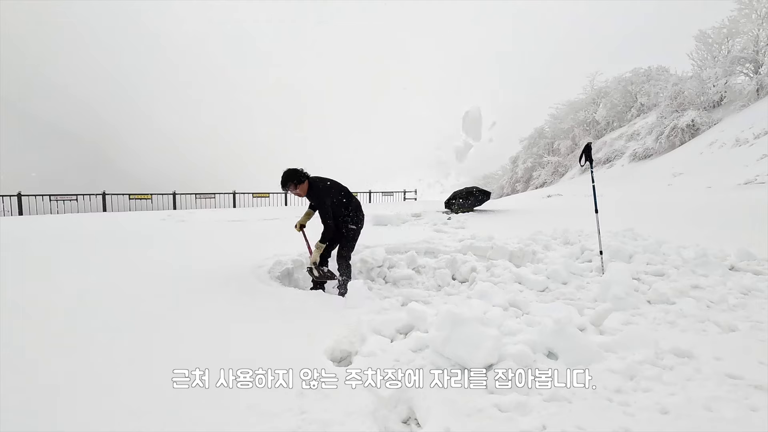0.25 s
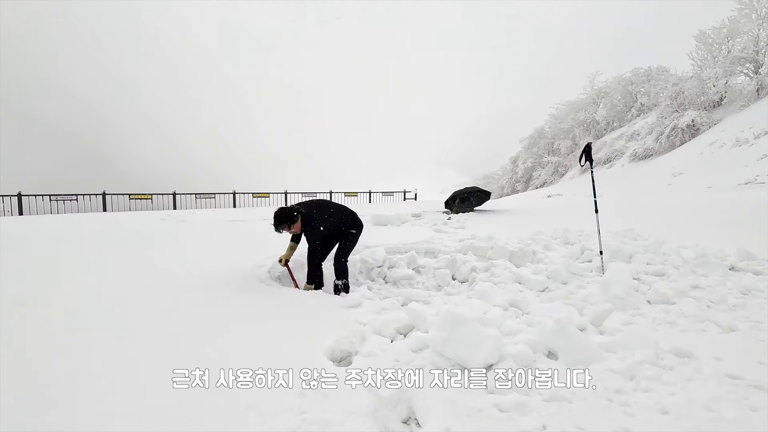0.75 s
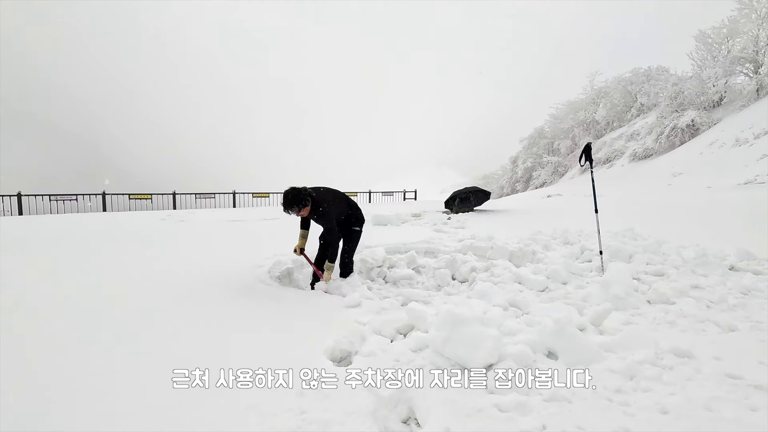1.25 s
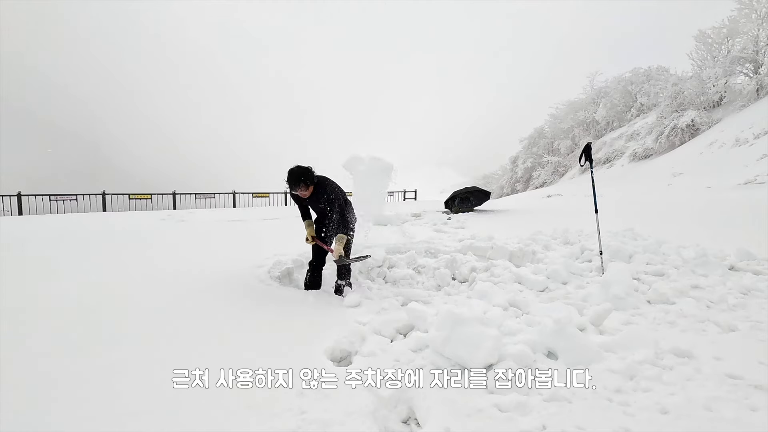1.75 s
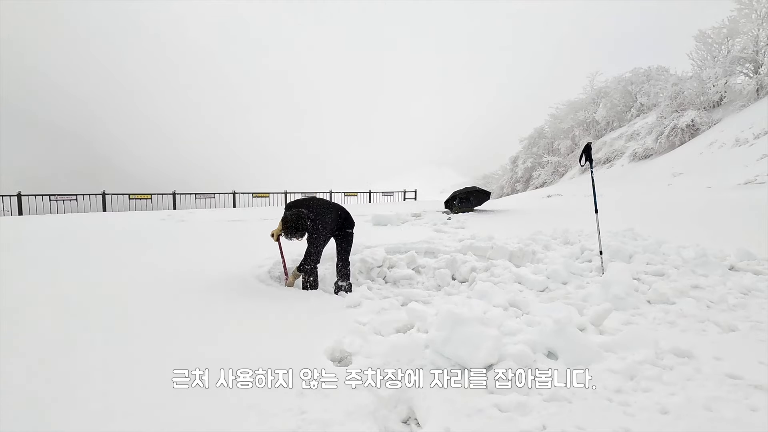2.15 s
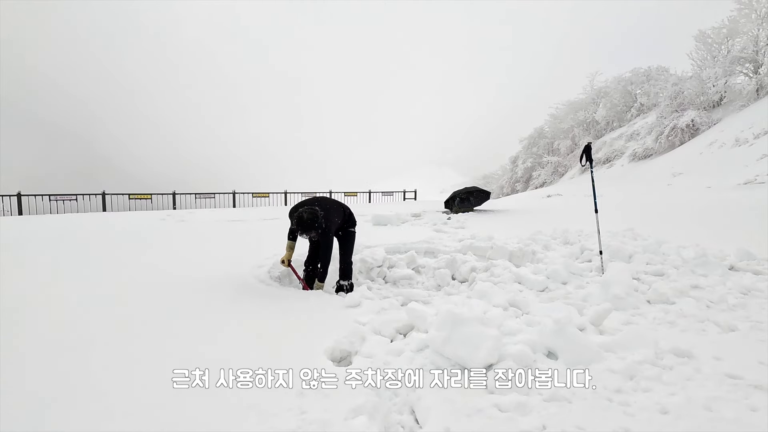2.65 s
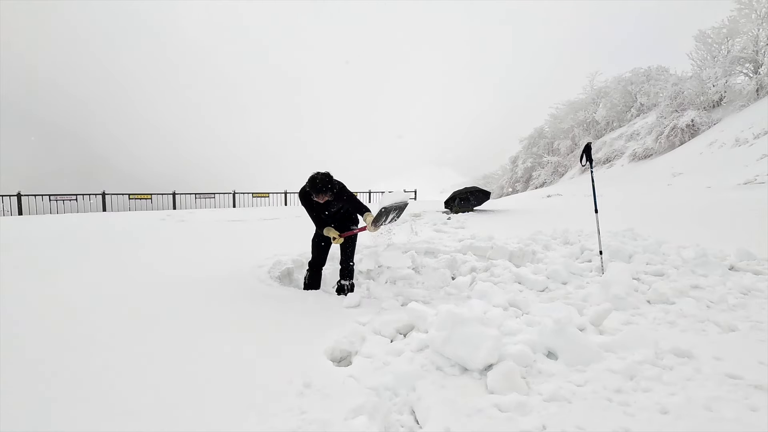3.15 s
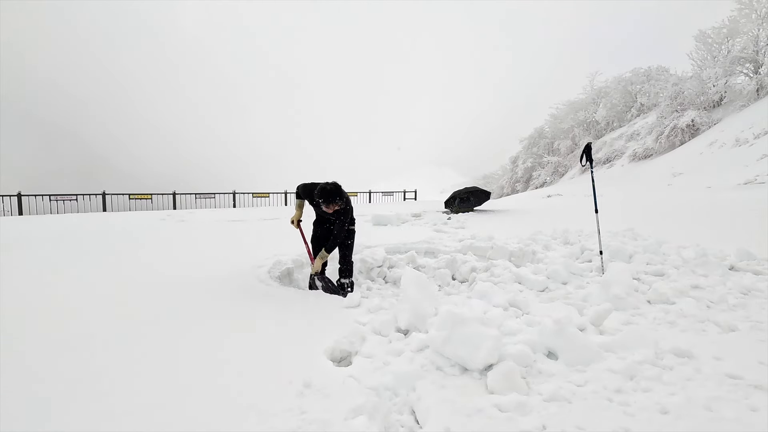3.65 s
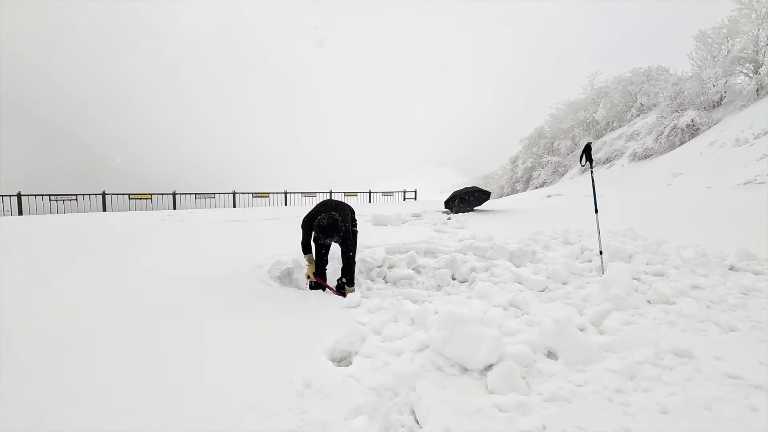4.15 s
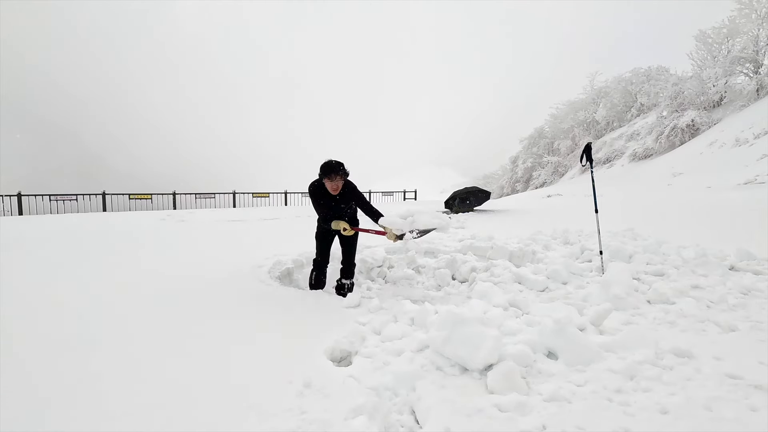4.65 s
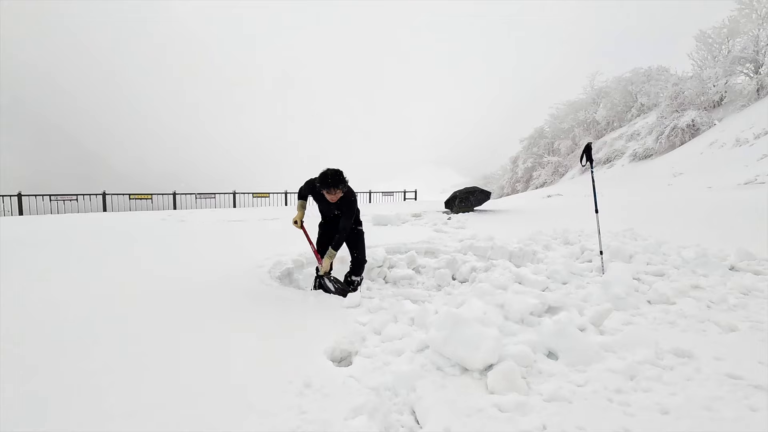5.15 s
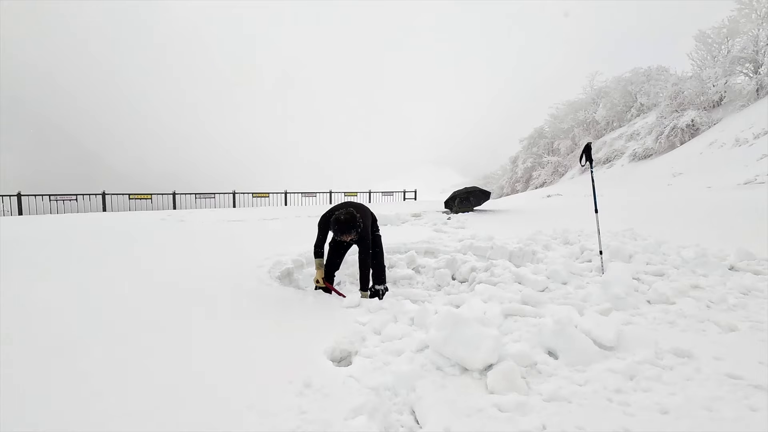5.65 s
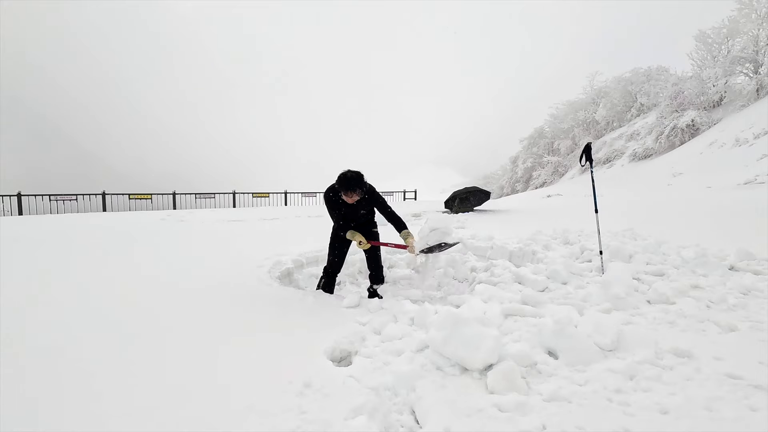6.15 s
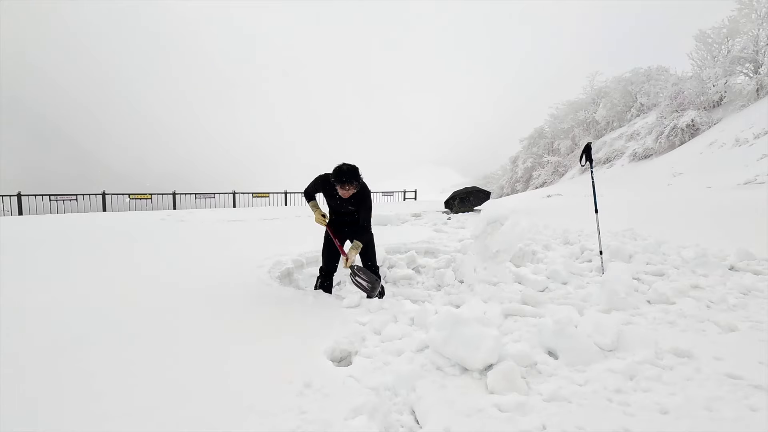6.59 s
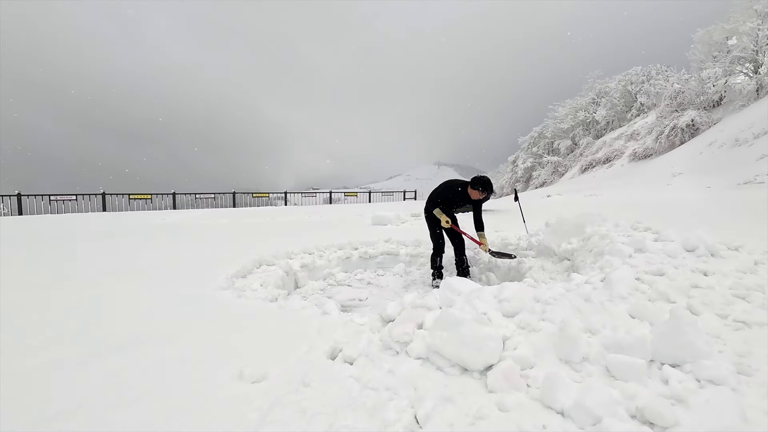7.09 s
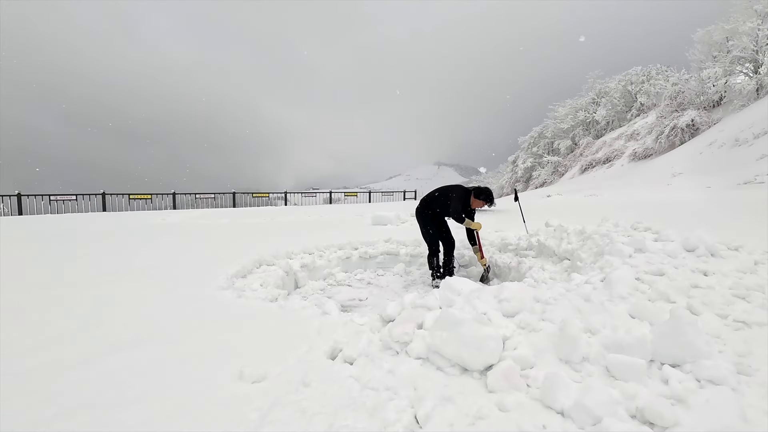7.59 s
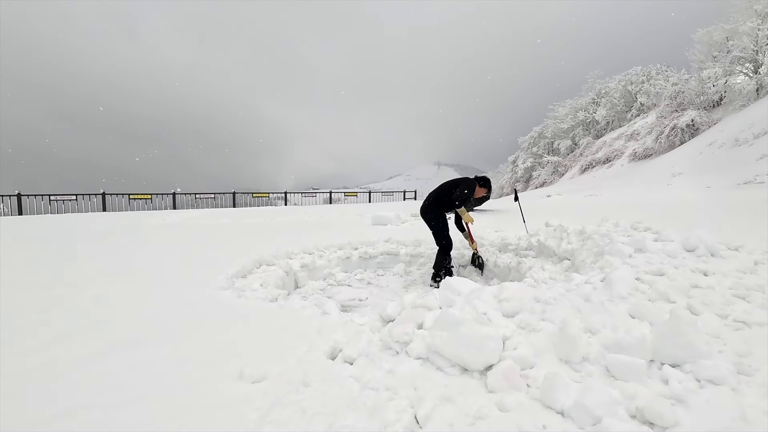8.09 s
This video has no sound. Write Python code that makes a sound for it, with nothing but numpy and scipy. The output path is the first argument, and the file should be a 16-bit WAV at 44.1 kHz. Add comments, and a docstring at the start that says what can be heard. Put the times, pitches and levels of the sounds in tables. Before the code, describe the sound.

A light metal shovel bites, scrapes and throws crunchy crusted snow on an open slope, while low wind buffets the microphone and roars behind.

```python
"""A light metal shovel bites, scrapes and throws crusty snow on an open hillside, a few metres off.
Crackling noise is the breaking snow; it also drives the ringing modes of the blade, and some tones squeak.
Wind buffets the microphone ports as low noise with single bumps, and noise in a higher band roars over
the slope; late on the roar stops abruptly. Open air and microphones add faint hiss."""
import sys
import numpy as np
from scipy import signal
from scipy.fft import rfft, irfft
from scipy.io import wavfile
from scipy.ndimage import uniform_filter1d

SR = 44100
rng = np.random.default_rng(int(sys.argv[2]) if len(sys.argv) > 2 else 0)


def undo_db(level):
    """Turn decibels back into plain size, where 20 dB means ten times bigger."""
    steps = np.asarray(level, float) / 20
    return 10 ** steps


def to_wav(s):
    """Save 16-bit WAV."""
    ch = np.atleast_2d(s).T  # columns
    pcm = np.round(np.clip(ch, -1, 1) * 32767)  # PCM
    wavfile.write(sys.argv[1], SR, pcm.astype(np.int16))


N = 367073  # length [samples]
TIME = np.arange(N) / SR  # [s]
STEP = np.arange(0, N / SR + .002, .002)  # coarse time for slow curves [s]
ROAR_STOP_S = 6.753


def evened(x):
    """Scales to rms 1."""
    return x / np.sqrt(np.mean(x ** 2) + 1e-20)


def read(points, hz):
    """Reads a spectrum on a log-frequency axis."""
    f, value = np.transpose(points)
    return np.interp(np.log(hz + 1), np.log(f + 1), value)


def filtered(x, order, hz, kind):
    """Keeps what lies below ("low") or above ("high") a frequency, without delay."""
    return signal.sosfiltfilt(signal.butter(order, hz, kind, fs=SR, output="sos"), x)


def add(mix, s, sound):
    """Mixes a sound in at s seconds."""
    part = mix[..., max(round(s * SR), 0):][..., :sound.shape[-1]]
    part += sound[..., :part.shape[-1]]


def sides(db):
    """Left and right gains for a level difference."""
    return undo_db(np.array([db / 2, -db / 2]))


def fine(x):
    """From steps of 2 ms to samples."""
    return np.interp(TIME, STEP, x)


def swells(middle, length, db):
    """One bell-shaped rise and fall per event, each a row."""
    away = (STEP - middle[:, None]) / length[:, None]
    return undo_db(db[:, None]) * np.exp(-(2 * away) ** 2)


def blend(shapes, *columns):
    """Level of overlapping events, the strongest prevailing, and each column weighted by power."""
    power = np.sum(shapes ** 2, axis=0)
    level = np.linalg.norm(shapes, ord=6, axis=0)
    return [level] + [np.array(c) @ shapes ** 2 / power for c in columns]


def wander(seconds, spread_db):
    """A gain that drifts by chance."""
    knots = np.arange(0, N / SR + 1, seconds)
    return np.interp(TIME, knots, undo_db(spread_db * rng.standard_normal(len(knots))))


def random_patches(shape, bins, frames):
    """Smooth random patches over frequency and time, rms 1."""
    patches = uniform_filter1d(rng.standard_normal(shape), size=bins, axis=0)
    return evened(uniform_filter1d(patches, size=frames, axis=1))


def pair(tone, size, same, patchy_db):
    """Two channels of partly alike noise with drifting patches."""
    hz, frames = np.fft.rfftfreq(size, 1 / SR), 4 * N // size + 5
    a, b, c, d = rng.standard_normal((4, len(hz), frames))
    same = np.clip(same * np.ones(len(hz)), -1, 1)[:, None]
    left = a + 1j * b
    right = same * left + np.sqrt(1 - same ** 2) * (c + 1j * d)
    patches = random_patches((len(hz), frames), bins=5, frames=6)
    z = np.array([left, right]) * undo_db(read(tone, hz)[:, None] + patchy_db * patches)
    return evened(signal.istft(z, nperseg=size, noverlap=size * 3 // 4)[1][:, :N])


# colour of each microphone's own hiss, relative: (frequency [Hz], level [dB per Hz])
HISS_COLOUR = [(8000, -44.5), (9500, -26), (10500, -11), (12500, -5), (14000, -4), (15200, -25.5)]


def microphone_hiss():
    """Each microphone makes its own faint noise, high in the treble."""
    colour = undo_db(read(HISS_COLOUR, np.fft.rfftfreq(N, 1 / SR)))
    noise = rfft(rng.standard_normal((2, N)))
    return undo_db(-98) * evened(irfft(noise * colour, N))


# colour of the open air, relative: (frequency [Hz], level [dB per Hz])
AIR_COLOUR = [(290, -21), (500, 6.5), (657, -12), (888, -7.5), (1350, 1.5), (2220, -15), (3320, -7.5),
              (4360, -17), (7420, -7.5), (12400, -28), (15400, -47)]
# how alike the air sounds left and right: (frequency [Hz], likeness [0 to 1])
AIR_LIKENESS = [(60, 0.66), (150, 0.74), (380, 0.15), (950, 0.29), (2380, 0.25), (5970, 0.77), (15000, 1)]


def open_air():
    """Faint, patchy hiss that is more alike on both sides at some frequencies than at others."""
    same = read(AIR_LIKENESS, np.fft.rfftfreq(512, 1 / SR))
    return undo_db(-75) * pair(AIR_COLOUR, size=512, same=same, patchy_db=5.0)


# swells of the roar: (middle [s], length [s], level [dB], brightness above 400 Hz [dB])
ROAR_SWELLS = [(0, .06, -49.5, -1), (0.244, .2, -58, -8), (0.79, 0.32, -50, -19), (1.372, 0.21, -49, 6),
               (1.917, 0.31, -49.5, 0), (2.412, 0.44, -46, -14), (2.968, 0.44, -50.5, 1),
               (3.5, 0.42, -45.5, 3), (4.17, 0.38, -49, -5), (4.678, 0.46, -47, 1.5),
               (5.062, 0.38, -44.5, -0.5), (5.287, 0.25, -49.5, 2), (5.655, 0.5, -48.5, 2.5),
               (5.955, 0.32, -47.5, 5), (6.31, .3, -41.5, -1), (6.738, 0.26, -44.5, -1.5)]
# colour of the roar, relative: (frequency [Hz], level [dB per Hz])
ROAR_COLOUR = [(65, -57), (110, -9), (129, -36), (165, -1.5), (205, 2.5), (263, 0), (355, -8.5), (426, -11),
               (706, -34.5), (800, -89), (1040, -115), (1760, -120)]


def slope_roar():
    """Wind over the slope: low noise, nearly alike on both sides, swells out of its lull, then stops."""
    lull_db, lull_bright_db = -56.5, -4
    middle, length, db, bright_db = np.transpose(ROAR_SWELLS)
    shapes = np.vstack([swells(middle, length, db), undo_db(lull_db) + 0 * STEP])
    level, bright_db = map(fine, blend(shapes, np.append(bright_db, lull_bright_db)))
    roar = pair(ROAR_COLOUR, size=2048, same=0.98, patchy_db=2.0)
    top = filtered(roar, 3, 400, "high")
    roar = (roar + (undo_db(bright_db) - 1) * top) * level
    return roar * (TIME < ROAR_STOP_S)


# gusts at the ports: (middle [s], length [s], level [dB], left-right [dB], flapping above 110 Hz [dB])
PORT_GUSTS = [(0, .08, -27.5, 0, -6), (0.21, 0.2, -40, -2, -10), (0.385, 0.094, -38.5, 5, 8),
              (0.614, .1, -31, -2, 6.5), (0.806, 0.087, -35, -5, 0.5), (0.951, 0.16, -36, -4, -3),
              (1.343, 0.21, -39, 1, 1), (2.024, 0.18, -37.5, 4.5, -3), (2.282, 0.12, -33.5, 1, 3.5),
              (2.852, .1, -41, -5, -4), (3.035, .1, -41, -4, -8), (3.91, 0.15, -45, -4, -3),
              (4.73, 0.11, -38.5, -1, -3), (4.874, .08, -33.5, -4, 5.5), (4.95, 0.071, -32, -6, -1),
              (5.293, 0.13, -35.5, -2, 3.5), (5.376, .06, -33.5, -4, -7), (5.518, 0.069, -41, -8, -14),
              (5.7, 0.14, -40, 3, -10), (5.862, 0.059, -35.5, -3, 9), (5.957, 0.063, -27.5, -3, -6),
              (6.24, .16, -38, -2, -7), (6.501, 0.068, -31, -2, 8), (6.788, 0.072, -31.5, -2, -9),
              (7.086, 0.1, -36, 2, -1.5), (7.353, .24, -34, -3.5, 0), (7.655, 0.062, -23.5, 1, 1.5),
              (7.601, 0.065, -34.5, -2, 11), (7.98, 0.066, -26.5, -4, -0.5), (8.078, 0.066, -32, -5, 9.5),
              (8.165, 0.16, -33, -2, 14.5)]
# breeze between gusts: (time [s], level [dB])
BREEZE_LEVEL = [(0, -43.5), (1.1, -45.5), (1.6, -48.5), (2.4, -42.5), (3.2, -49.5), (4.4, -54.5),
                (4.7, -46.5), (6.4, -44), (6.65, -47.5), (6.9, -43), (7.5, -41), (7.8, -36), (8.32, -38)]
# colour of the buffeting, relative: (frequency [Hz], level [dB per Hz])
BUFFET_COLOUR = [(8.8, -35), (15, 8), (43, -1), (124, -14.5), (164, -18), (261, -30), (344, -36.5),
                 (402, -47), (600, -59.5), (780, -73), (1320, -120)]


def buffeting():
    """Lumpy gusts press on the microphone ports as low noise, with more or less of faster flapping."""
    middle, length, db, pan_db, flap_db = np.transpose(PORT_GUSTS)
    breeze = undo_db(np.interp(STEP, *np.transpose(BREEZE_LEVEL)))
    shapes = np.vstack([swells(middle, length, db), breeze])
    # the breeze has its own left-right and flapping values
    level, pan_db, flap_db = map(fine, blend(shapes, np.append(pan_db, .5), np.append(flap_db, -2.5)))
    noise = pair(BUFFET_COLOUR, size=2048, same=0.68, patchy_db=2.0)
    flap = filtered(noise, 3, 110, "high")
    veer = wander(.05, spread_db=1.5)
    gusts = (noise + (undo_db(flap_db) - 1) * flap) * level
    return gusts * sides(pan_db) * np.array([veer, 1 / veer])


# single pressure bumps of a gust: (start [s], peak [dB], frequency [Hz], left-right [dB])
GUST_BUMPS = [(0.584, -22, 54.7, -6), (0.864, -26, 48.4, -8), (2.241, -31, 46.2, -0.5),
              (4.908, -28, 45.8, -4), (5.93, -20.5, 74.4, -4.5), (6.471, -27.5, 36.3, -5.5),
              (7.627, -27.5, 32.7, 3), (7.957, -22.5, 60.3, -3)]


def pressure_bumps():
    """Each bump is about one turn of a low wave under a bell shape, at its peak 27 ms after its start."""
    out = np.zeros((2, N))
    for s, db, hz, pan_db in GUST_BUMPS:
        turns = (np.arange(0, .08, 1 / SR) - .027) * hz
        bump = np.cos(2 * np.pi * turns) * np.exp(-(turns / 0.57) ** 2)
        add(out, s, undo_db(db) * sides(pan_db)[:, None] * bump)
    return out


def crackle(per_s, spread_db):
    """Snow crystals snapping at random, some larger than the rest."""
    size = undo_db(spread_db * np.minimum(rng.exponential(1, N), 5))
    snaps = rng.random(N) < per_s / SR
    return evened(size * rng.standard_normal(N) * snaps)


def tinted(x, bright, deep):
    """Finer crystals give more treble, larger lumps more depth."""
    low = filtered(x, 3, 1300, "low")
    high = filtered(x, 3, 4800, "high")
    return x + (bright - 1) * high + (deep - 1) * low


def crumbling(x, patchy_db):
    """Lumps of changing size shift the colour in patches some 25 ms by 700 Hz."""
    z = signal.stft(x, nperseg=256, noverlap=192)[2]
    z = z * undo_db(patchy_db * random_patches(z.shape, bins=4, frames=16))
    return signal.istft(z, nperseg=256, noverlap=192)[1][:N]


# blade sliding through snow: (crest [s], effort [dB], swell [s], fade [s], depth of low crunch [dB])
BLADE_STROKES = [(.05, -65, 0.11, 0.1, -8), (.12, -63, 0.09, 0.056, 2), (.29, -69.5, 0.15, 0.23, -5),
                 (.62, -75.5, 0.045, .1, 14), (.71, -51.5, 0.029, .1, -10), (.74, -50, .07, 0.18, -4.5),
                 (.84, -55, .1, .15, -6), (.93, -62.5, .15, 0.099, -5), (1.2, -76.5, .14, 0.2, 5),
                 (1.39, -67, 0.13, 0.037, -5), (1.53, -64, 0.11, 0.17, -8),
                 (1.64, -49.5, 0.074, 0.084, -17), (1.7, -52.5, 0.13, 0.024, -10),
                 (1.77, -68.5, 0.051, 0.068, -3), (2.194, -47, 0.014, 0.022, -6),
                 (2.28, -50, 0.057, 0.086, -13), (2.34, -51, 0.11, 0.041, 13), (2.39, -67, .05, 0.073, 4),
                 (2.525, -58.5, 0.016, 0.093, 16), (2.63, -54.5, 0.11, .25, 1),
                 (2.81, -49, 0.067, 0.11, 7.5), (2.94, -52.5, 0.085, 0.13, -2.5),
                 (3.06, -55.5, 0.11, 0.047, -14), (3.2, -65, 0.095, 0.068, -1),
                 (3.3, -69.5, 0.047, .16, -17), (3.452, -58.5, 0.043, 0.076, 3.5),
                 (3.54, -63.5, .12, 0.19, -4), (3.75, -56, 0.062, 0.053, 8), (3.8, -62, 0.14, .12, -3),
                 (3.932, -36, 0.026, 0.033, -6), (3.97, -47, .06, .06, -1.5),
                 (4.005, -37.5, 0.026, 0.041, -2), (4.06, -47, 0.087, 0.13, 4.5),
                 (4.16, -56.5, 0.11, 0.065, 5), (4.42, -71, 0.033, 0.071, 4), (4.53, -73, 0.17, 0.13, 0),
                 (4.726, -46.5, 0.081, 0.11, -2), (4.784, -49, .06, 0.049, -1.5),
                 (4.93, -73.5, 0.13, 0.36, 2), (5.13, -69, 0.11, .1, 13), (5.21, -56, 0.051, 0.043, -2),
                 (5.28, -58.5, 0.079, 0.053, -1), (5.35, -75, .08, .08, 0), (5.42, -63, 0.068, 0.13, 0.5),
                 (5.5, -54.5, .03, 0.28, -12), (5.63, -54, .15, .12, -3), (5.8, -72.5, 0.087, .12, -6),
                 (5.97, -66.5, 0.082, 0.11, 5), (6.07, -54.5, 0.097, 0.056, -9),
                 (6.19, -66.5, 0.13, 0.18, -3), (6.3, -51, 0.059, 0.13, -19),
                 (6.4, -53.5, 0.071, .045, -14), (6.52, -70, 0.14, 0.12, 2), (6.62, -57, 0.11, 0.094, -8),
                 (6.72, -58.5, .09, 0.071, -6), (6.77, -75, .03, .08, -6), (6.82, -62, 0.033, 0.13, -5),
                 (6.95, -56.5, 0.041, 0.097, -14), (7.2, -71.5, 0.075, 0.27, -13),
                 (7.36, -67, 0.29, .2, -4), (7.576, -53.5, 0.067, 0.095, -16), (7.65, -53, 0.11, 0.09, -10),
                 (7.7, -57, .06, .03, -7), (7.755, -61, 0.063, .06, -7), (7.87, -61.5, 0.068, 0.14, -10),
                 (7.98, -55.5, 0.13, 0.16, -11), (8.115, -44.5, 0.062, 0.064, -8),
                 (8.19, -51.5, .12, 0.079, -8), (8.265, -40.5, 0.03, 0.076, -11), (8.3, -44, .05, .1, -7)]


def scrape():
    """Force of dense crackle in uneven clumps while the blade slides."""
    crest, db, swell, fade, deep_db = np.transpose(BLADE_STROKES)[..., None]
    away = np.where(STEP < crest, (crest - STEP) / swell, (STEP - crest) / fade)
    strokes = undo_db(db - 20 * np.minimum(away, 4) ** 2)  # 20 dB down one swell before, one fade after
    rustle = undo_db(-83.5) + 0 * STEP  # loose snow between strokes
    effort, deep_db = map(fine, blend(np.vstack([strokes, rustle]), np.append(deep_db, 6)))
    force = crackle(per_s=9000, spread_db=0.5) + 0.17 * rng.standard_normal(N)
    force = crumbling(force * effort * wander(0.0077, spread_db=1.0), patchy_db=2.0)
    # a shallow stroke loses the finest treble too, by this share of its depth in dB
    finest, skim_share = filtered(force, 3, 9500, "high"), 0.28
    force = force + (undo_db(skim_share * np.minimum(deep_db, 0)) - 1) * finest
    # harder strokes break coarser lumps: treble lost per dB of effort above the even level
    dulling, even_db = 0.28, -56.5
    return tinted(force, (effort / undo_db(even_db)) ** -dulling, undo_db(deep_db))


# crust breaking at the edge: (time [s], level [dB], brightness [dB], depth [dB], length [s])
CRUST_BITES = [(0.0328, -51, 10, 8, 0.008), (0.112, -64, -14, -6, .01), (.284, -57, 8, -18, .014),
               (.497, -72.5, 9, 17, .016), (.693, -51, 7, -11, 0.025), (1.067, -68, 12, -7, .012),
               (1.109, -65.5, 9, -12, 0.024), (1.143, -59.5, 3, -14, 0.012),
               (2.144, -43.5, 10.5, -15, 0.0096), (2.187, -48.5, 5, 8, .012), (2.251, -45, 3, -15, 0.029),
               (2.323, -32, 1, 1.5, 0.054), (2.516, -55, 3, 3, .022), (2.5523, -42, -7, 8, 0.018),
               (2.676, -46, 0.5, 10, 0.024), (2.792, -37.5, -4, 0.5, 0.022),
               (3.201, -57.5, -9, 12.5, 0.022), (3.27, -52.5, 2.5, -28, 0.048),
               (3.311, -56, 5.5, -20, .026), (3.439, -52.5, 16, -9, 0.044), (3.55, -59, 11.5, -13, 0.041),
               (3.721, -24.5, -2, -8.5, .026), (3.909, -32, 3.5, -7, 0.032), (3.93, -38, 9, -13, 0.03),
               (3.998, -31.5, -2, 3.5, 0.042), (4.411, -59, -4, -10, .026), (4.6314, -62, 2, -1, .014),
               (4.703, -55, -6, -5, .014), (4.785, -38.5, -5, -15, 0.016), (5.032, -57.5, 9, -10, 0.031),
               (5.174, -47, -3.5, -14, 0.015), (5.256, -51.5, 7.5, 1, 0.017),
               (5.476, -48.5, 1.5, -16, 0.024), (5.617, -44, -7, -14, .027), (5.86, -61, 3, -3, 0.016),
               (6.05, -57, -8, -11, .016), (6.282, -47.5, -12, -4, 0.028), (6.477, -59.5, -15, 10, .024),
               (6.695, -47.5, 7.5, 2, 0.0072), (6.803, -51.5, -5, -6, 0.014),
               (7.569, -38.5, -19, -18, 0.0095), (7.621, -27, -14, -13, 0.015),
               (7.701, -41.5, -27, -14, 0.0089), (8.008, -36, -6, -13, 0.036),
               (8.111, -41.5, -3, -5.5, .03), (8.161, -44, -11, 2, 0.018), (8.247, -33.5, -13, -20, .03)]


def bites():
    """Force of each break, a quick burst of cracks."""
    force, colour = np.zeros(N), np.ones((2, N))
    for s, db, bright_db, deep_db, length in CRUST_BITES:
        u = np.arange(0, 1.5 * length, 1 / SR) / length
        burst = np.tanh(u / .13) * np.exp(-(2.2 * u) ** 2)
        add(force, s - .002, undo_db(db) * burst)
        colour[:, round((s - .003) * SR):] = [[undo_db(bright_db)], [undo_db(deep_db)]]  # until the next bite
    grit = crackle(per_s=25000, spread_db=1.2)
    return tinted(force * grit, colour[0], colour[1])


# one mode sings out alone, struck or squeaking as the edge sticks:
# (start [s], length [s], from [Hz], to [Hz], starting level [dB])
EDGE_SQUEAKS = [(.112, .015, 2070, 1900, -53), (.485, .02, 1610, 1500, -61), (1.695, .035, 5160, 5160, -55),
                (1.705, .045, 2460, 2460, -59), (2.144, .04, 2210, 2210, -44),
                (3.275, .085, 1700, 1700, -60), (3.727, .022, 3240, 3240, -31),
                (3.735, .055, 1700, 1700, -50), (5.1, .09, 1450, 1750, -61), (7.02, .03, 1700, 1700, -65),
                (7.165, .06, 1950, 1850, -66), (7.44, .06, 1700, 1600, -68), (8.09, .05, 4650, 4650, -50),
                (8.25, .06, 1000, 1000, -49)]


def squeaks():
    """Short, slightly rough tones that fade and may glide."""
    out = np.zeros(N)
    for s, length, from_hz, to_hz, db in EDGE_SQUEAKS:
        rub = 1 + 2.1 * uniform_filter1d(rng.standard_normal(6000), size=80)[:round(length * SR)]
        turns = np.cumsum(np.linspace(from_hz, to_hz, len(rub))) / SR
        fade = undo_db(np.linspace(db, db - 9, len(rub))) * signal.windows.tukey(len(rub), .3)
        add(out, s, fade * rub * np.sin(2 * np.pi * turns))
    return out


def causal(db):
    """The shortest impulse response with this colour."""
    log = np.log(undo_db(np.maximum(db, -100)))
    circle = np.concatenate([log, log[-2:0:-1]])
    return np.fft.ifft(np.exp(np.conj(signal.hilbert(circle)))).real[:2048]


# colour of breaking snow, relative: (frequency [Hz], level [dB per Hz])
SNOW_COLOUR = [(260, -25), (450, -5.5), (492, -10), (651, -27), (778, -12.5), (1490, -2.5), (1830, -3.5),
               (2190, -5.5), (2390, -1), (2540, -0.5), (3570, -4.5), (5990, -7.5), (7590, -7), (12500, -24),
               (15400, -43.5)]


def snow_sound(force):
    """Gives the breaking force the colour of snow heard directly."""
    snow = causal(read(SNOW_COLOUR, np.fft.rfftfreq(4096, 1 / SR)))
    return signal.oaconvolve(force, snow / np.linalg.norm(snow))[:N]


def mode(x, hz, t60):
    """A two-pole ring of energy 1 that falls 60 dB in t60 seconds."""
    r, w = undo_db(-60 / t60 / SR), 2 * np.pi * hz / SR
    return signal.lfilter([np.sin(w) * np.sqrt(2 * (1 - r * r))], [1, -2 * r * np.cos(w), r * r], x)


# modes of the bare blade, levels relative: (frequency [Hz], level [dB], time to fall 60 dB [s])
BLADE_MODES = [(1010, -12, .05), (1165, -10, .05), (1480, -8, .06), (1700, -4, .17), (1900, -6, .07),
               (2210, 0, .09), (2460, -3, .1), (2790, -3, .1), (3240, -2, .05), (3450, -3, .1),
               (3600, -4, .08), (3920, -5, .07), (4260, -8, .07), (4650, -6, .08), (5160, -8, .08),
               (5550, -10, .04), (6800, -6, .03), (7350, -6, .03), (8150, -12, .06)]
# snow slides off and the bared blade rings freely:
# (middle [s], length [s], ring against the crunch [dB], on top of the covered blade's)
BARED_BLADE = [(1.67, .2, -2), (2.15, .06, 2), (3.31, .14, -5), (3.74, .14, -10), (4.75, .22, -4),
               (5.56, .25, -12), (6.3, .2, -7), (6.95, .3, -8), (8.22, .4, -9)]


def blade_ring(slide, blow):
    """Snow forces ring the metal modes, those near the roaming contact most; snow on it shortens them."""
    covered_db, loaded_db, loaded_t60_share = -20, -5, .25
    bare = fine(undo_db(covered_db) + swells(*np.transpose(BARED_BLADE)).sum(0))
    spot_hz = 2700 * wander(.06, spread_db=2.2)  # modes near this frequency are favoured
    total = np.linalg.norm(undo_db(np.array(BLADE_MODES)[:, 1]))
    out = np.zeros(N)
    for hz, db, t60 in BLADE_MODES:
        off = hz / spot_hz - 1
        rubbed = wander(.05, spread_db=3) * (.7 + .7 / (1 + (off / .12) ** 2))
        struck = .7 + 1.2 / (1 + (off / .06) ** 2)
        drive = (slide * rubbed + blow * struck) * undo_db(db) / total
        out += mode(drive * bare, hz, t60)
        out += undo_db(loaded_db) * mode(drive, hz, t60 * loaded_t60_share)
    return out


def shovel():
    """Breaking snow sounds directly and through the blade, with squeaks of the edge."""
    slide, blow = scrape(), bites()
    return snow_sound(slide + blow) + blade_ring(slide, blow) + squeaks()


# where the digger stands, heard below the treble: (time [s], left-right [dB])
DIGGER_SIDE = [(0.0, -3), (0.69, -1), (1.88, -2.5), (1.97, -1.5), (3.15, -1), (4.33, -2), (4.52, -5),
               (4.96, -3), (5.24, -4), (5.49, -3), (5.75, -2), (6.31, -4), (6.68, -2), (6.98, -5),
               (7.35, -3.5), (8.32, -3)]


def spread(x):
    """Below the treble the near microphone hears the digger louder; shifting weak echoes differ at each."""
    pan_db = np.interp(TIME, *np.transpose(DIGGER_SIDE))
    # late on the digger stands further aside: the difference reaches higher up
    below = np.where(TIME < ROAR_STOP_S, filtered(x, 4, 4000, "low"), filtered(x, 4, 8000, "low"))
    top = filtered(x, 5, 10500, "high")  # the ports scatter the shortest waves
    out = x + (sides(pan_db) - 1) * below
    scattered = undo_db(-14.5 + 1.3 * abs(pan_db)) * below + undo_db(-2) * top
    t = np.arange(600) / SR
    for k in range(3):  # three sets of echoes take turns
        echoes = rng.standard_normal(len(t)) * undo_db(-60 * t / 0.013)
        share = np.cos(np.pi * (TIME / 0.39 + k / 3)) * np.sqrt(2 / 3)
        wet = signal.oaconvolve(scattered * share, echoes / np.linalg.norm(echoes))[:N]
        out += np.outer([1, -1], wet)  # opposite sign left and right
    return out


def scene():
    """Shovel, wind and the faint hiss of the open air, faded in over 8 ms."""
    wind = buffeting() + pressure_bumps() + slope_roar()
    return (spread(shovel()) + wind + open_air()) * np.minimum(TIME / .008, 1)


# lean of the microphones before it is phased in from none at 7 kHz to full at 14 kHz:
# (frequency [Hz], left-right [dB])
MICROPHONE_LEAN = [(60, -1.0), (180, 0.0), (550, -0.5), (1650, 15), (4970, -3), (15000, 6.5)]


def microphones(dry):
    """The microphones lean slightly apart in the treble, and the top fades out from 14.5 to 15.3 kHz."""
    hz = np.fft.rfftfreq(N, 1 / SR)
    lean = sides(read(MICROPHONE_LEAN, hz) * np.clip(np.log2(hz / 7000 + 1e-9), 0, 1))
    top_fade = np.clip((15300 - hz) / 800, 0, 1)
    return irfft(rfft(dry, axis=1) * lean * top_fade, N, axis=1)


def band_limit(x):
    """A steep low-pass at the top of the band."""
    return signal.sosfilt(signal.butter(12, 15580, fs=SR, output="sos"), x)


def record(dry):
    """The microphones pick up the scene and add their own hiss."""
    mix = microphones(dry) + microphone_hiss()
    return band_limit(mix)


dry = scene()
out = record(dry)
to_wav(out)
```